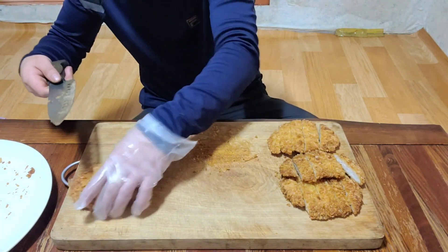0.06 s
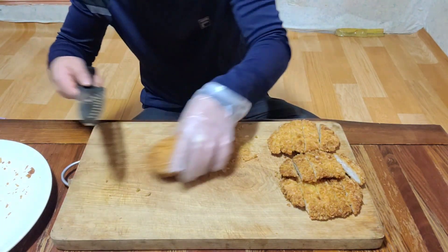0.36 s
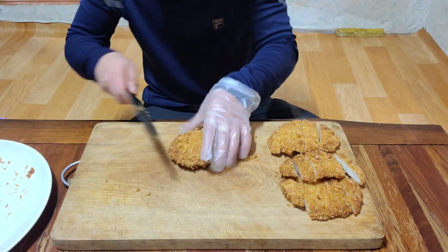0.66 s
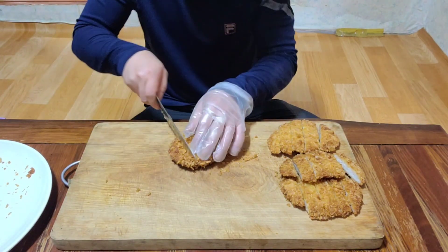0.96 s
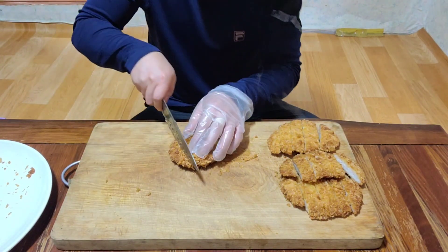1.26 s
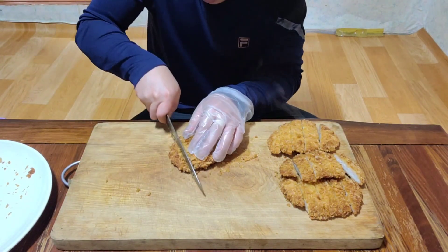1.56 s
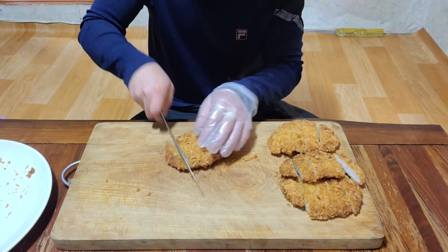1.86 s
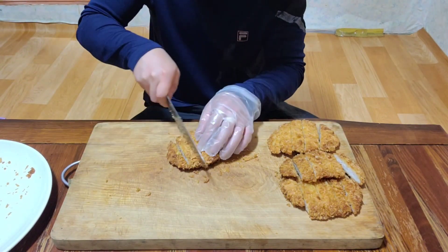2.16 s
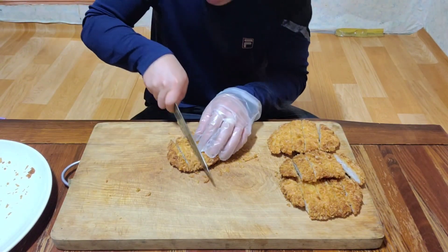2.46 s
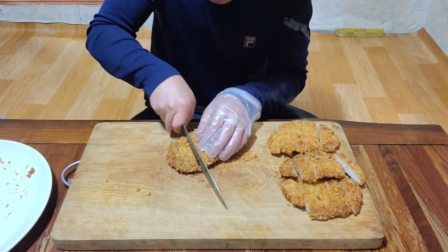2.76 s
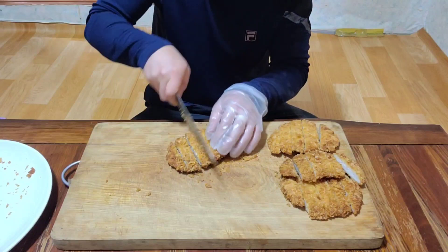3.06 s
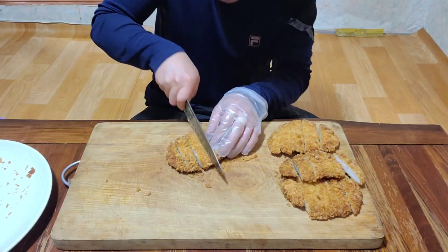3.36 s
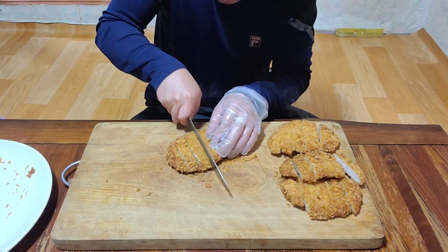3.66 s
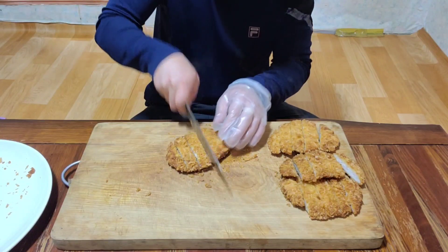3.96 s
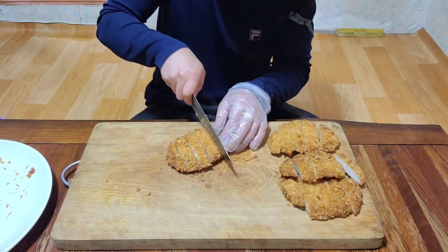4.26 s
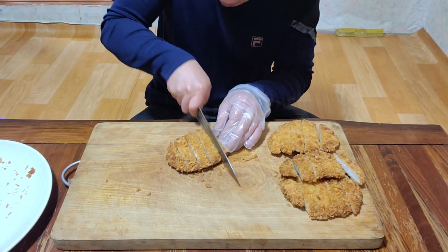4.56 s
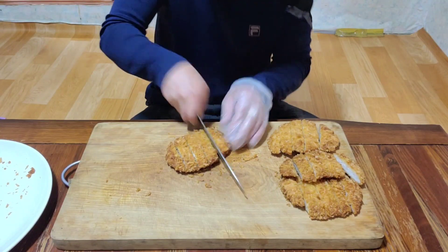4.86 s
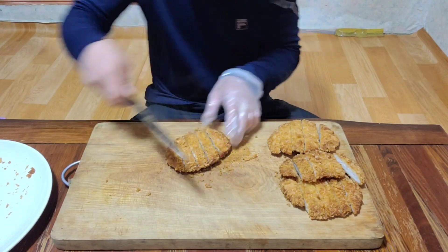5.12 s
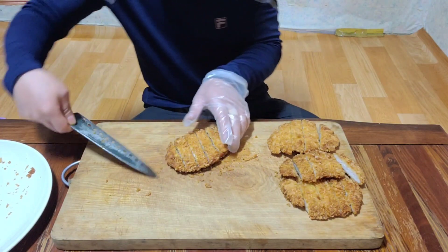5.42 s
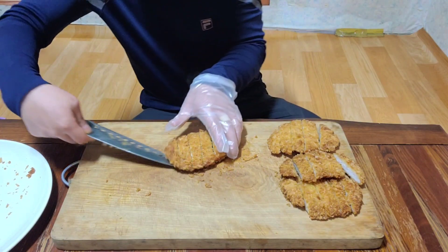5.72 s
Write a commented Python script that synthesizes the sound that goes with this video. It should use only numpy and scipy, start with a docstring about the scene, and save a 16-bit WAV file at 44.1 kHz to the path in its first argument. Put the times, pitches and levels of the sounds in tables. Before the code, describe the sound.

A knife crunches four times through a crisp fried cutlet, knocking on a wooden board, with soft plastic glove crinkles.

```python
"""A small room, a thick wooden board: a chef's knife makes four cuts through a crisp breaded cutlet.
The crust breaks in dense tiny fractures and a few big snaps; each cut ends with a knock on the board.
A hand in a plastic glove slides and turns the cutlet. At last the knife tip is set down and dragged,
ringing the blade. One microphone, over a low house rumble."""
import sys
import numpy as np
from scipy import signal
from scipy.fft import rfft, irfft, next_fast_len
from scipy.io import wavfile
from scipy.ndimage import uniform_filter1d, map_coordinates

SR = 44100
rng = np.random.default_rng(int(sys.argv[2]) if len(sys.argv) > 2 else 0)


def waveform_to_disk(signal):
    """Save audio, clipped to [-1, 1], as 16-bit WAV at the path in sys.argv[1]."""
    frames = np.transpose(np.atleast_2d(signal))
    scaled = np.clip(frames, -1, 1) * 32767
    samples = np.round(scaled).astype(np.int16)
    wavfile.write(sys.argv[1], SR, samples)


N = 264149

# spectra of fine crumbs and coarse crust: freq_hz, density_db
CRUMB_SPECTRUM = [(300, -44), (1500, 5.5), (3000, -1.5), (5000, 0), (6800, -4), (7800, 4), (9000, 0.5),
                  (12500, 2), (15800, -3)]
CRUST_SPECTRUM = [(100, -9.5), (250, -2.5), (450, 1.5), (750, 1.5), (1300, 2.5), (1800, -3.5), (3200, -3),
                  (5000, -8.5), (7000, -19), (16000, -55)]
# board on its table: freq_hz, width_hz, gain_db
BOARD_MODES = [(97, 27, -6), (120, 39, -4.5), (173.7, 17, 3.5), (215.4, 13, -7), (289, 28, -5),
               (400, 28, -9), (469, 30, -6), (593, 57, -2.5), (731.5, 26, -2.5), (933, 43, -9),
               (1310, 310, -17.5), (1800, 69, -19), (2370, 1900, -17)]

def cutting():
    """The edge bursts crumbs and crust; the soft meat passes only low jolts on to the board."""
    crumb_gain, crust_gain, board_gain = blade_effort()
    fine = fractures(rate_hz=3000, spread_db=2, clump_db=1, clump_hz=160, life_s=0.007)
    crackle = coloured(patchy(fine, depth_db=1.6), CRUMB_SPECTRUM)
    coarse = fractures(rate_hz=1500, spread_db=2, clump_db=2, clump_hz=110, life_s=0.0045)
    crunch = coloured(patchy(coarse, depth_db=3), CRUST_SPECTRUM)
    jolts = fractures(rate_hz=600, spread_db=2, clump_db=2.55, clump_hz=130)
    rumble = unit(ringing(lowpass(jolts, corner_hz=250), BOARD_MODES))
    return crumb_gain * crackle + crust_gain * crunch, board_gain * rumble


# edge settles on the crust: start_s, hold_s, level_db, board_relative_db
EDGE_BITES = [(1.241, 0.043, -53.5, 2), (1.353, .05, -54, 6), (2.438, 0.075, -55.5, 2),
              (3.435, .06, -55, 2.5), (4.411, 0.014, -54.5, -10)]
# blade goes through a crust layer: start_s, attack_s, hold_s, level_db, board_relative_db
BLADE_PUSHES = [(1.401, 0.0038, 0.16, -38, -3.5), (1.573, 0.046, 0.039, -36.5, -4.5),
                (1.856, 0.031, 0.023, -41.5, -3.5), (2.532, 0.072, 0.05, -39, -8.5),
                (2.656, 0.04, 0.13, -39, -4), (3.487, 0.093, 0.03, -38.5, -9),
                (3.618, 0.083, 0.13, -39.5, 1), (4.485, 0.074, 0.14, -43.5, -5.5),
                (4.703, 0.029, 0.082, -40.5, 0)]
# blade draws back along the cut faces: start_s, hold_s, level_db, board_relative_db
BLADE_PULLS = [(1.725, 0.037, -50, 4), (1.98, 0.064, -59.5, 3.5), (2.854, 0.052, -54.5, -1.5),
               (3.868, 0.082, -52, 4.5), (4.022, 0.057, -64.5, -13), (4.828, 0.1, -56, -9)]

def blade_effort():
    """Gains of crumbs, crust and board as the blade bites, pushes through and pulls free."""
    def share(shape, db, board_db, crumbs_db):
        return np.outer(amp([db + crumbs_db, db, db + board_db]), shape)
    bites = [share(stroke(start, 0.01, hold, release_db_per_s=210), db, board_db, crumbs_db=-1)
             for start, hold, db, board_db in EDGE_BITES]
    pushes = [share(stroke(start, attack, hold, release_db_per_s=249), db, board_db, crumbs_db=-3.5)
              for start, attack, hold, db, board_db in BLADE_PUSHES]
    pulls = [share(stroke(start, 0.024, hold, release_db_per_s=202), db, board_db, crumbs_db=-5)
             for start, hold, db, board_db in BLADE_PULLS]
    return together(bites + pushes + pulls)


# big pieces of crust give way: start_s, level_db
CRUST_SNAPS = [(.6555, -55), (1.241, -47.5), (1.283, -43), (1.350, -40.5), (1.4025, -28.5), (1.410, -37),
               (1.4325, -27), (1.474, -36), (1.497, -28.5), (1.514, -27.5), (1.618, -51), (1.648, -55),
               (1.776, -46), (1.8756, -33.5), (2.4355, -56), (2.453, -46.5), (2.5435, -34), (2.692, -28),
               (2.742, -32.5), (3.439, -42), (3.585, -36), (3.951, -34), (4.417, -45.5), (4.505, -41),
               (4.532, -51), (4.679, -35.5)]
# spectrum of a snap: freq_hz, density_db
SNAP_SPECTRUM = [(60, -11.5), (170, 9), (400, -21.5), (800, 10), (1400, -5), (2200, -5.5), (4000, -22),
                 (6600, -15), (8000, -15), (15800, -17.5)]

def snaps():
    """Big cracks run through the crust, each a short burst of chatter."""
    cracks = blows(CRUST_SNAPS, t60_s=0.06, chatter=3)
    return amp(-7.5) * coloured(cracks, SNAP_SPECTRUM)


# edge saws on crust or wood: start_s, length_s, pitch_hz, level_db
EDGE_RASPS = [(0.683, 0.083, 810, -51.5), (0.848, 0.032, 965, -51), (1.243, 0.047, 796, -49),
              (2.444, 0.055, 990, -49), (2.449, 0.042, 2400, -51), (2.585, 0.082, 2180, -44),
              (2.878, 0.075, 1355, -46), (2.89, 0.13, 945, -63), (3.433, 0.037, 1025, -52),
              (3.927, 0.063, 946, -44), (4.308, 0.14, 1780, -68), (4.317, 0.066, 3050, -71),
              (4.428, 0.062, 890, -50.5), (4.503, 0.15, 1100, -47.5), (5.697, 0.061, 890, -53.5),
              (5.72, 0.031, 2020, -55), (5.898, 0.021, 3404, -52)]

def rasps():
    """Quick slips of the edge excite one narrow resonance, set by where the blade is held."""
    slips = fractures(rate_hz=1600, spread_db=4, clump_db=4, clump_hz=170)
    track = np.zeros(N)
    for start_s, length_s, pitch_hz, db in EDGE_RASPS:
        progress = np.clip((np.arange(N) / SR - start_s) / length_s, 0, 1)
        envelope = np.sqrt(progress) * (1 - progress)
        rasp = envelope * signal.lfilter(*signal.iirpeak(pitch_hz, Q=14, fs=SR), slips)
        track += amp(db) * rasp / np.linalg.norm(rasp) * np.sqrt(length_s * SR)
    return amp(-7) * track


# blade or cutlet meets the board: start_s, level_db, hardness_hz, bass_cut_hz
BOARD_KNOCKS = [(.235, -42.5, 111, 20), (0.656, -40.5, 110, 18), (0.691, -41, 140, 20),
                (1.899, -27.5, 910, 35), (1.903, -22, 800, 24), (2.037, -52, 120, 20),
                (2.630, -28.5, 200, 23), (2.788, -25.5, 1800, 270), (3.711, -26, 200, 20),
                (3.829, -20.5, 550, 40), (3.84, -28, 150, 20), (4.742, -25, 400, 150),
                (4.7876, -26, 1500, 160), (4.792, -23, 1000, 380)]

def knocks():
    """Blows ring the board; meat under the edge softens them, and those near its supports lose bass."""
    force = np.zeros(N)
    for start_s, db, hardness_hz, bass_cut_hz in BOARD_KNOCKS:
        soft_pole, bass_pole = np.exp(-2 * np.pi * np.array([hardness_hz, bass_cut_hz]) / SR)
        blow = signal.lfilter([1 - soft_pole], [1, -soft_pole], contact(t60_s=0.057, chatter=0.56))
        add(force, start_s, amp(db) * signal.lfilter([1, -1], [1, -bass_pole], blow))
    return amp(-4) * ringing(force, BOARD_MODES)


# gloved hand grips or shifts the cutlet: start_s, attack_s, hold_s, glove_db, rub_db
HAND_GRIPS = [(0.0, 0.0033, .1, -66, -75.5), (0.099, 0.1, 0.012, -49, -57.5),
              (0.246, 0.026, 0.021, -60.5, -60.5), (0.408, .012, 0.046, -76, -88),
              (0.643, 0.012, 0.072, -57, -58), (0.75, 0.1, 0.0053, -52.5, -53.5),
              (0.97, 0.046, .19, -61.5, -66), (2.195, 0.023, 0.11, -65.5, -73.5),
              (3.02, 0.042, 0.0033, -54.5, -54.5), (3.26, 0.016, 0.15, -70, -78.5),
              (4.303, 0.016, 0.099, -67.5, -76.5), (4.999, 0.032, 0.064, -58.5, -56.5),
              (5.115, 0.013, 0.16, -59.5, -65), (5.298, 0.02, 0.078, -55.5, -60),
              (5.407, 0.024, 0.28, -60, -60), (5.704, 0.089, 0.0073, -51, -52.5),
              (5.86, 0.038, 0.056, -57, -55)]
# spectra of bright rustle and of crust on wood: freq_hz, density_db
RUSTLE_SPECTRUM = [(300, -35), (1200, -1), (2500, -1.5), (4800, 1.5), (6600, -0.5), (7900, 5.5),
                   (9500, 2.5), (13000, 2), (15800, 1)]
RUB_SPECTRUM = [(70, -21.5), (170, 7), (260, -1.5), (600, 1), (1000, 0.5), (1500, -3.5), (2500, -1.5),
                (5000, -6.5), (12000, -40)]

def handling():
    """The glove crinkles and the crust rubs over the wood."""
    glove_gain, rub_gain = together(
        np.outer(amp([glove_db, rub_db]), stroke(start, attack, hold, release_db_per_s=196))
        for start, attack, hold, glove_db, rub_db in HAND_GRIPS)
    crinkles = fractures(rate_hz=4000, spread_db=1, clump_db=2.6, clump_hz=90, life_s=0.005)
    scrapes = fractures(rate_hz=2000, spread_db=2, clump_db=2, clump_hz=190)
    return glove_gain * coloured(crinkles, RUSTLE_SPECTRUM) + rub_gain * coloured(scrapes, RUB_SPECTRUM)


# tip lands and skips: start_s, level_db
TIP_TAPS = [(5.596, -45), (5.603, -35), (5.796, -61)]
# tip slides over the wood: start_s, hold_s, level_db
TIP_DRAGS = [(5.638, 0.024, -54), (5.703, 0.01, -44.5), (5.779, 0.01, -44.5), (5.887, .04, -49.5)]
# knife with its tip on the wood: freq_hz, width_hz, gain_db
KNIFE_MODES = [(129, 30, -5), (291, 22, -1), (554, 24, 1), (900, 28, -1), (1220, 60, -9), (1630, 70, -7),
               (2070, 26, 3), (2890, 110, -10), (3400, 150, -10), (4700, 400, -16)]

def knife_tip():
    """The tip lands with a click and rings the blade's bending modes; dragging stirs the low ones."""
    taps = blows(TIP_TAPS, t60_s=0.077, chatter=0.51)
    slips = fractures(rate_hz=250, spread_db=1.5, clump_db=3.5, clump_hz=81)
    drag_gain = together(amp(db) * stroke(start, 0.01, hold, release_db_per_s=300)
                         for start, hold, db in TIP_DRAGS)
    force = taps + amp(3.5) * drag_gain * lowpass(slips, corner_hz=1100)
    return amp(-4) * ringing(force, KNIFE_MODES) + amp(-14.5) * coloured(taps, RUSTLE_SPECTRUM)


# ticks of glove film and crumbs: start_s, level_db
DRY_TICKS = [(0.2264, -59), (0.2783, -48), (0.422, -54.5), (0.6904, -46), (0.8004, -45), (1.0157, -37),
             (1.1653, -33), (1.3169, -56), (1.9797, -32), (3.36, -45.5), (3.4406, -34), (5.0474, -36.5),
             (5.141, -39), (5.2043, -30.5), (5.2501, -37), (5.2864, -53), (5.3034, -34.5), (5.4285, -35),
             (5.456, -40), (5.5384, -35)]
# spectrum of a tick: freq_hz, density_db
TICK_SPECTRUM = [(200, -14), (1500, 2), (4500, 4.5), (6800, 5), (8000, 8), (13000, 6.5), (16000, -24)]

def ticks(echo_s=0.0026):
    """Single sharp ticks, each reflected by the board."""
    direct = amp(-21) * coloured(blows(DRY_TICKS, t60_s=0.0054, chatter=0.31), TICK_SPECTRUM)
    echo = filtered(direct, lambda hz: np.exp(-2j * np.pi * hz * echo_s))
    return direct + amp(-4.5) * echo


# room decay: freq_hz, t60_s
ROOM_DECAY = [(120, 0.46), (500, 0.22), (2000, 0.23), (6000, 0.2), (15000, 0.15)]

def room(x, wet_db, tail_count):
    """Direct sound plus a short tail that dies faster in the treble and changes as the hands move."""
    hz, t, noise = signal.stft(rng.standard_normal((tail_count, SR // 3)), SR, nperseg=256)
    decay = amp(-60 * t / along(ROOM_DECAY, hz)[:, None])
    tails = signal.istft(noise * decay, SR, nperseg=256)[1]
    wet = np.zeros(N)
    for span, tail in zip(np.array_split(np.arange(N), tail_count), tails):
        add(wet, span[0] / SR + 0.005, signal.fftconvolve(x[span], tail / np.linalg.norm(tail)))
    # the board's bass arrives mostly direct
    return x + amp(wet_db) * filtered(wet, lambda f: 1j * f / (220 + 1j * f))


# house background: freq_hz, density_db
HOUSE_SPECTRUM = [(20, -17), (35, -7), (56, 7.5), (80, -9.5), (125, -1), (200, -16.5), (400, -21.5),
                  (1200, -30), (4000, -32), (9000, -30.5), (16000, -35)]

def room_tone():
    """Low, slightly wavering house rumble with faint hiss."""
    level_db = -65 + 1.3 * wobble(rate_hz=5.3)
    return amp(level_db) * coloured(rng.standard_normal(N), HOUSE_SPECTRUM)


def fractures(rate_hz, spread_db, clump_db, clump_hz, life_s=0.014):
    """Tiny impulses of scattered size, rms 1, swelling in avalanches that decay over life_s."""
    happens = rng.random(N) < rate_hz / SR
    sizes = amp(spread_db * np.clip(rng.standard_normal(N), -2, 2)) * rng.choice([-1, 1], N)
    onsets = (rng.random(N) < clump_hz / SR) * rng.random(N)
    avalanche = signal.lfilter([1], [1, -np.exp(-1 / (life_s * SR))], onsets)
    return unit(happens * sizes * amp(clump_db * np.minimum(avalanche / avalanche.std(), 4)))


def patchy(x, depth_db):
    """Flakes vary in size, so each moment favours other pitches."""
    spectra = signal.stft(x, nperseg=512)[2]
    patches = uniform_filter1d(rng.standard_normal(spectra.shape), size=4, axis=0)
    patches = uniform_filter1d(patches, size=5, axis=1)
    return unit(signal.istft(spectra * amp(depth_db * unit(patches)), nperseg=512)[1][:N])


def contact(t60_s, chatter):
    """A sharp push, then dying chatter; energy of 10 ms at level 1."""
    t = np.arange(SR // 10) / SR
    tail = rng.standard_normal(len(t)) * amp(-60 * t / t60_s)
    force = (t == 0) + chatter * tail / np.linalg.norm(tail)
    return force / np.linalg.norm(force) * np.sqrt(SR / 100)


def blows(rows, t60_s, chatter):
    """A track with one contact per row."""
    track = np.zeros(N)
    for start_s, db in rows:
        add(track, start_s, amp(db) * contact(t60_s, chatter))
    return track


def stroke(start_s, attack_s, hold_s, release_db_per_s):
    """Gain of one movement: rise, hold, decay."""
    age_s = np.arange(N) / SR - start_s
    rise = np.clip(age_s / attack_s, 0, 1)
    return rise * amp(-release_db_per_s * np.maximum(age_s - attack_s - hold_s, 0))


def together(strokes):
    """Overlapping movements add in power."""
    return np.sqrt(sum(gain ** 2 for gain in strokes))


def ringing(x, modes):
    """x through a body's resonances; keeps white-noise power."""
    def response(hz):
        body = sum((-1) ** k * amp(db) * 1j * hz * width / (centre ** 2 - hz ** 2 + 1j * hz * width)
                   for k, (centre, width, db) in enumerate(modes))
        return body / np.sqrt(np.mean(np.abs(body) ** 2))
    return filtered(x, response)


def coloured(x, spectrum):
    """x through a causal filter of the given spectrum; keeps white-noise power."""
    def response(hz):
        cepstrum = irfft(np.log(unit(amp(along(spectrum, hz)))))
        return np.exp(rfft(2 * cepstrum[:len(hz) - 1], len(cepstrum)) - cepstrum[0])
    return filtered(x, response)


def lowpass(x, corner_hz):
    """Two-pole low-pass."""
    return filtered(x, lambda hz: 1 / (1 + 1j * hz / corner_hz) ** 2)


def filtered(x, response):
    """x through a complex frequency response."""
    size = 2 * next_fast_len(N // 2 + SR // 4)
    return irfft(rfft(x, size) * response(np.fft.rfftfreq(size, 1 / SR)), size)[:N]


def wobble(rate_hz):
    """Smooth curve through random knots."""
    return map_coordinates(rng.standard_normal(N // 20), [np.arange(N) * rate_hz / SR])


def along(points, hz):
    """Interpolates on a log frequency axis."""
    knots_hz, values = np.transpose(points)
    return np.interp(np.log(hz + 1), np.log(knots_hz + 1), values)


def add(track, start_s, sound):
    """Mixes a sound into the track."""
    part = track[round(start_s * SR):][:len(sound)]
    part += sound[:len(part)]


def amp(db):
    """Decibels to gain."""
    return 10 ** (np.asarray(db) / 20)


def unit(x):
    """Scales to rms 1."""
    return x / np.sqrt(np.mean(x ** 2) + 1e-20)


def scene():
    """All sources in the room, mono on two channels."""
    crust, rumble = cutting()
    food = room(crust + snaps() + rasps() + handling(), wet_db=-6, tail_count=72)
    board_and_knife = room(knocks() + knife_tip(), wet_db=-0.5, tail_count=12)
    ticking = room(ticks(), wet_db=-8, tail_count=12)
    mono = food + rumble + board_and_knife + ticking + room_tone()
    return np.array([mono, mono])


TOP_HZ = 15850

def record(dry):
    """Brick-wall low-pass at TOP_HZ."""
    return np.array([filtered(channel, lambda hz: hz < TOP_HZ) for channel in dry])


dry = scene()
out = record(dry)
waveform_to_disk(out)
```